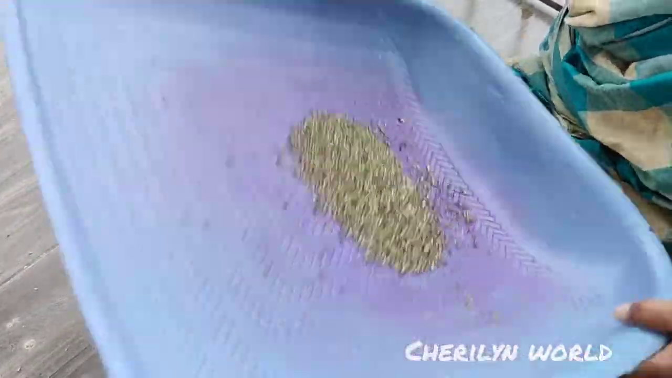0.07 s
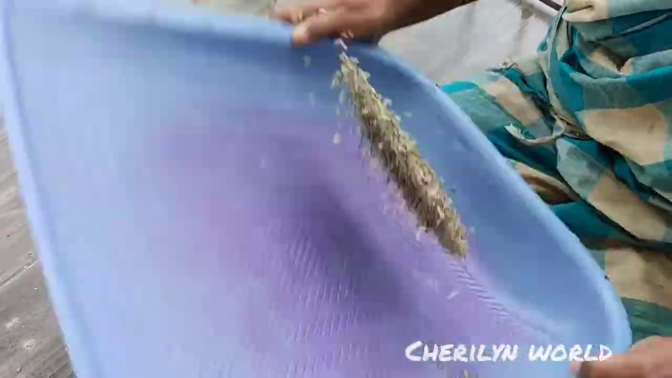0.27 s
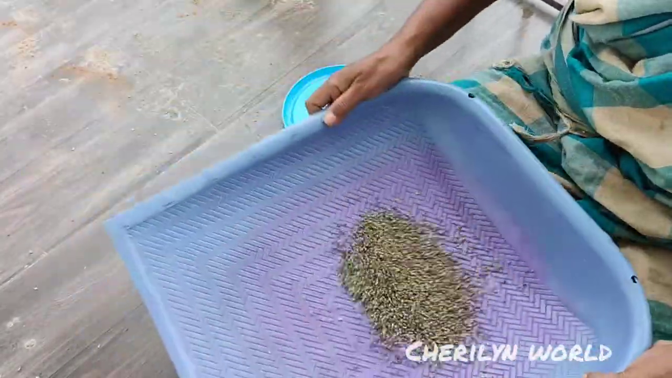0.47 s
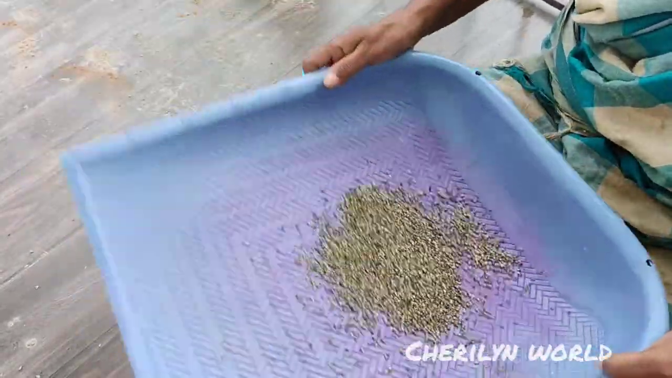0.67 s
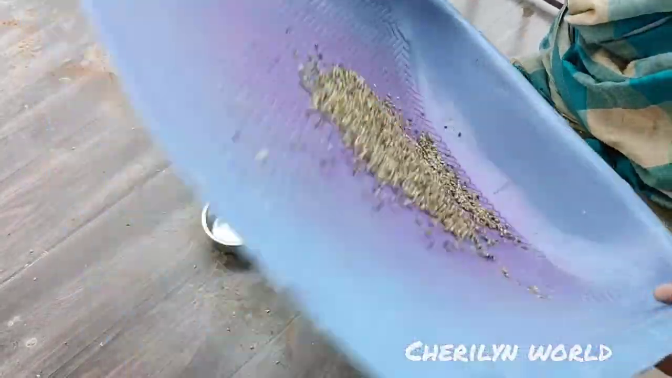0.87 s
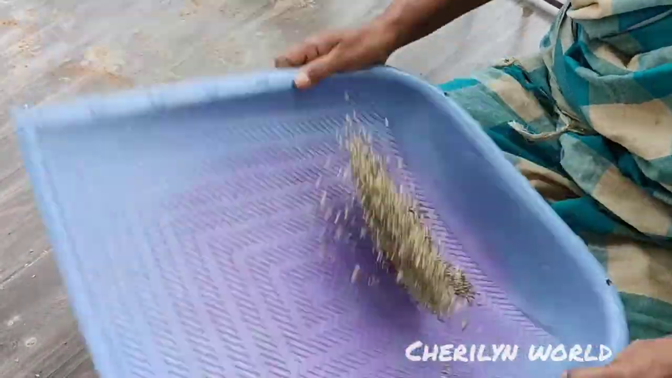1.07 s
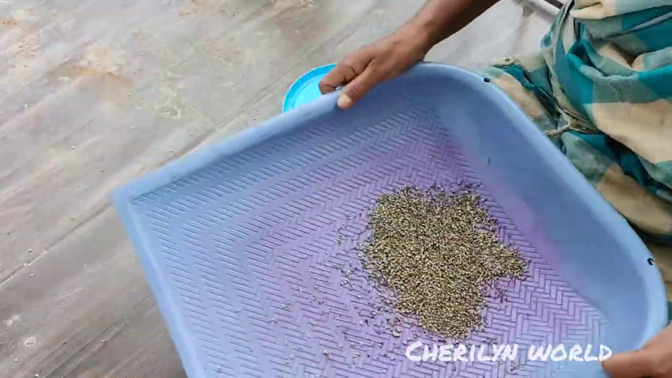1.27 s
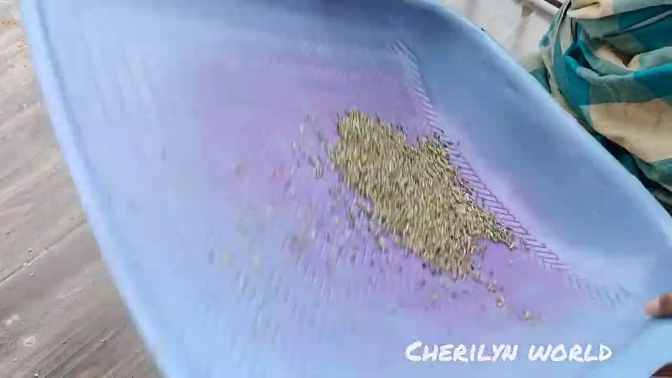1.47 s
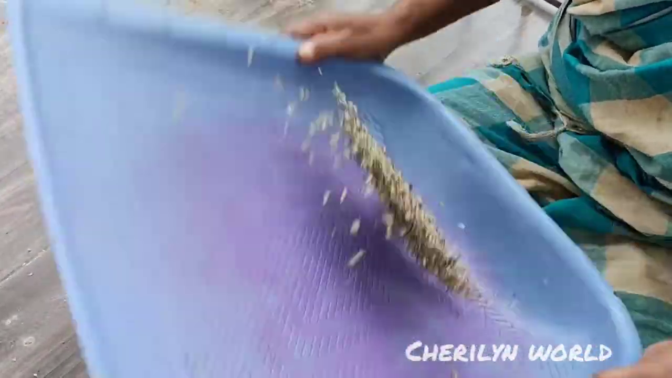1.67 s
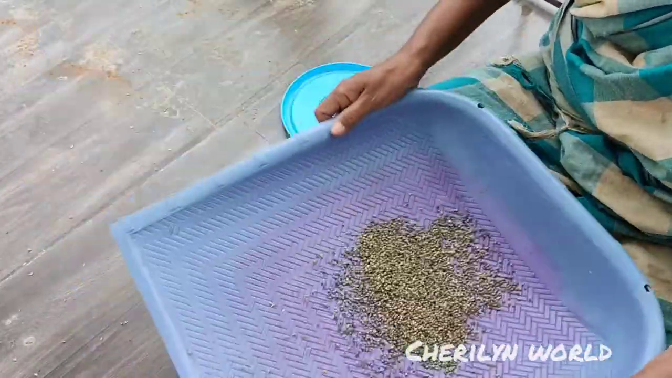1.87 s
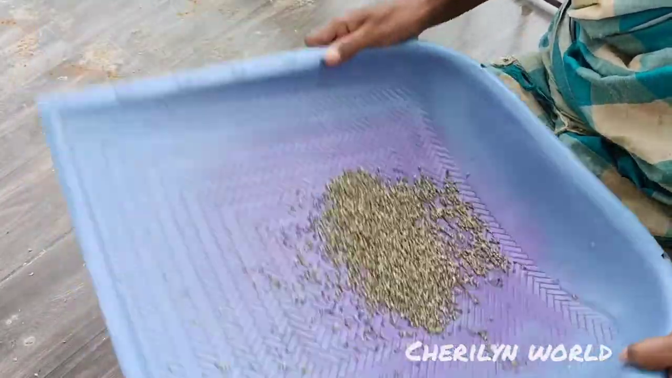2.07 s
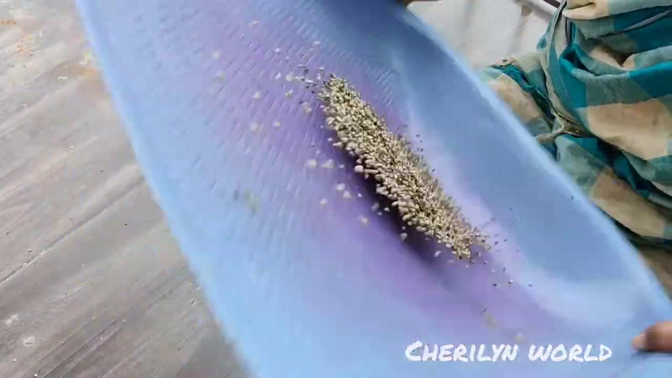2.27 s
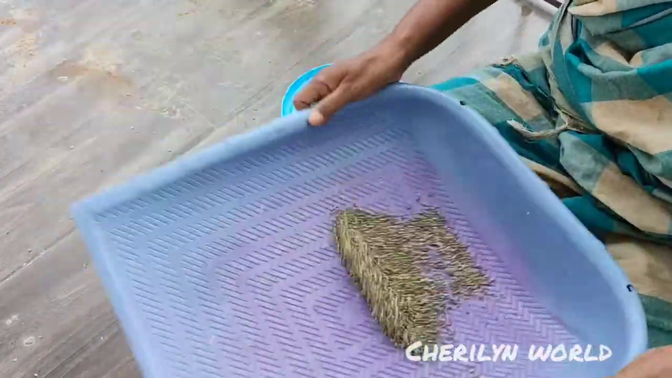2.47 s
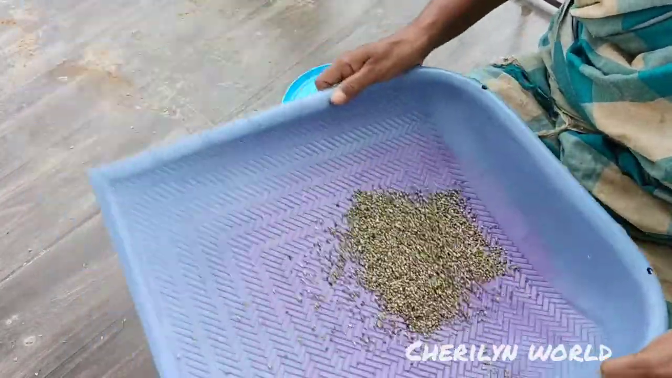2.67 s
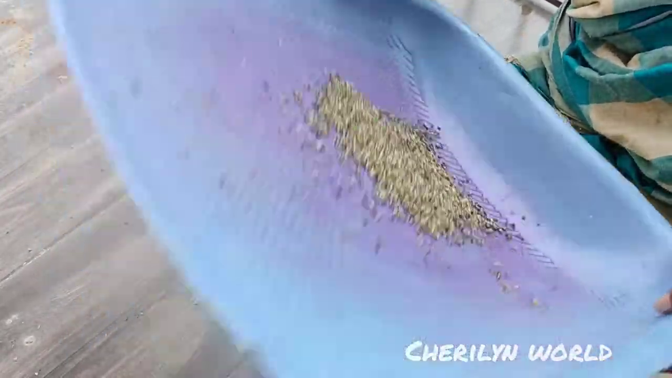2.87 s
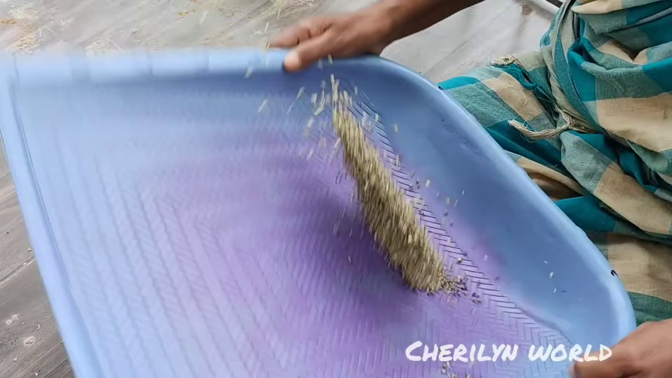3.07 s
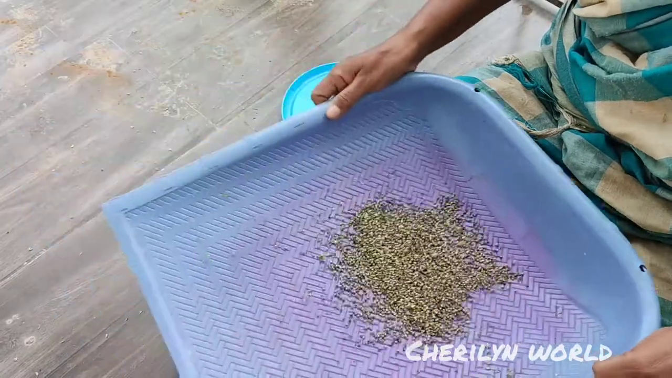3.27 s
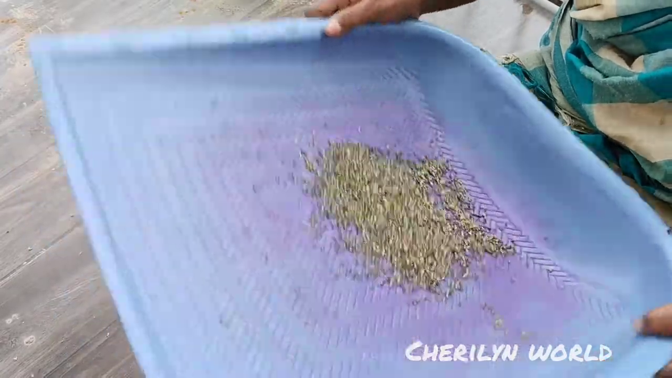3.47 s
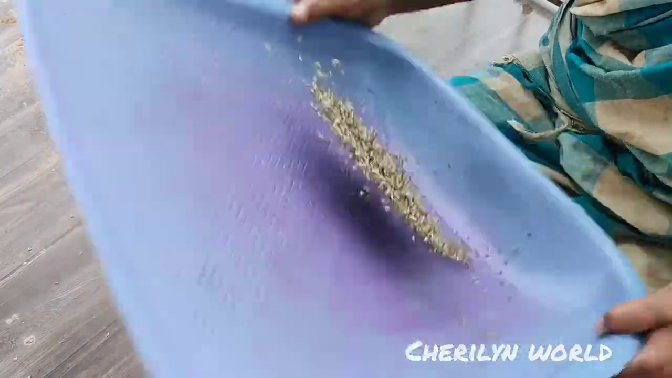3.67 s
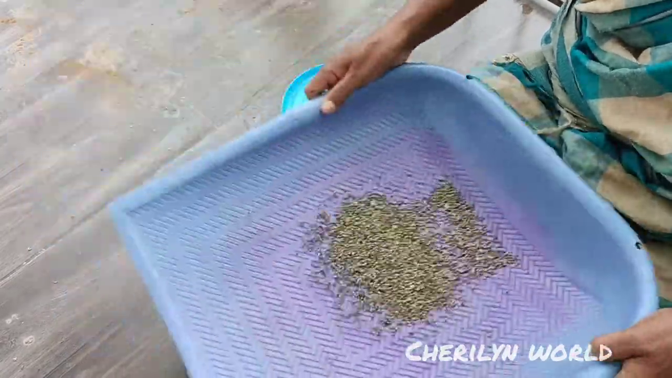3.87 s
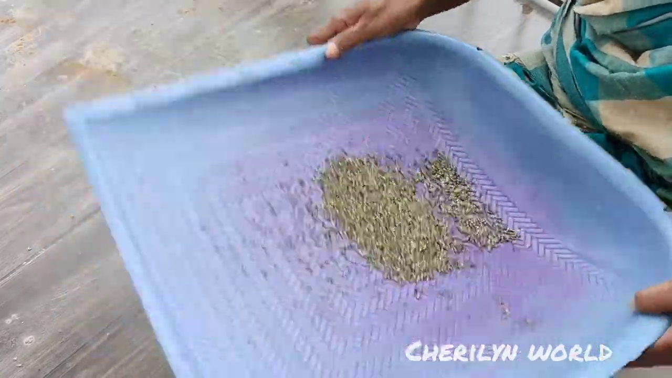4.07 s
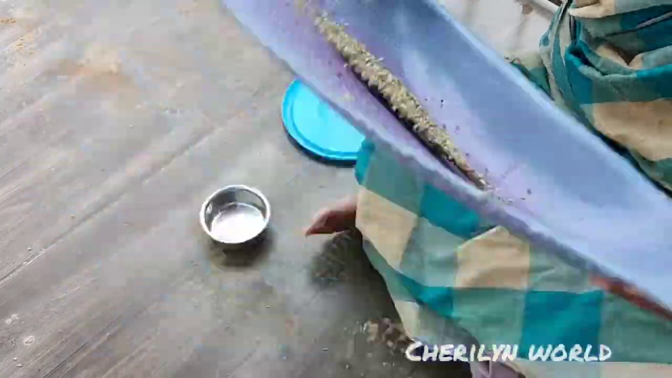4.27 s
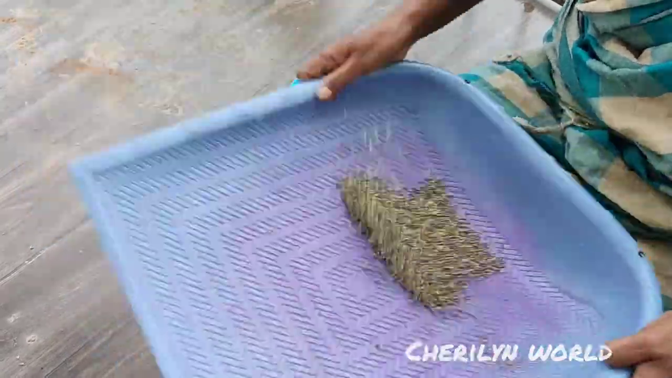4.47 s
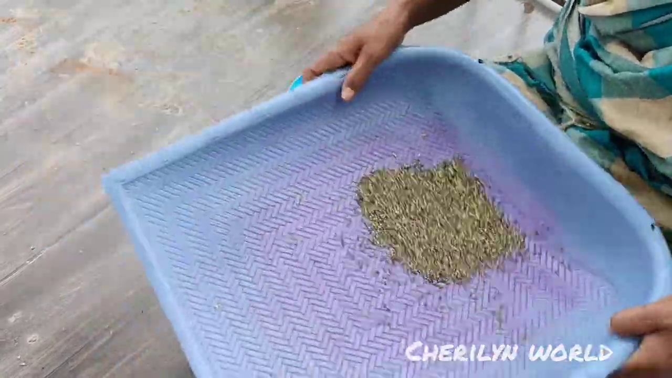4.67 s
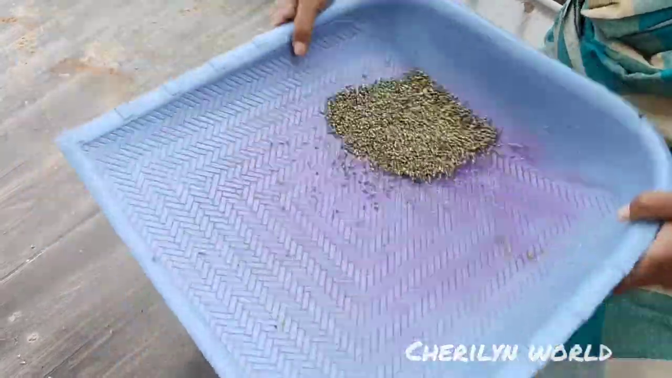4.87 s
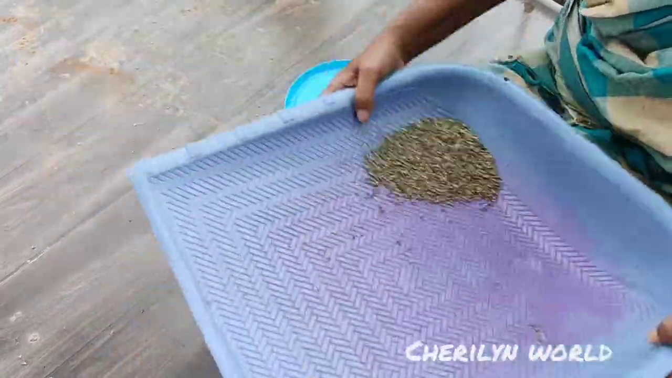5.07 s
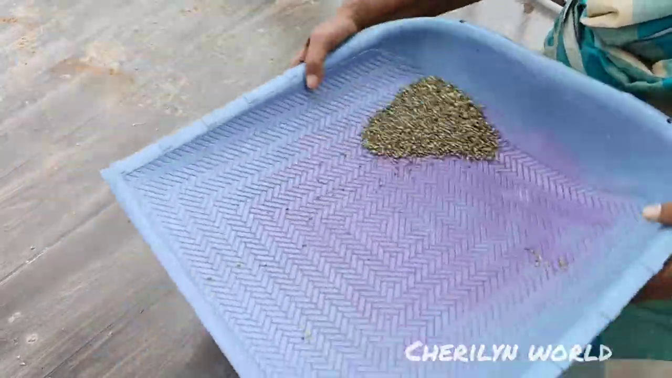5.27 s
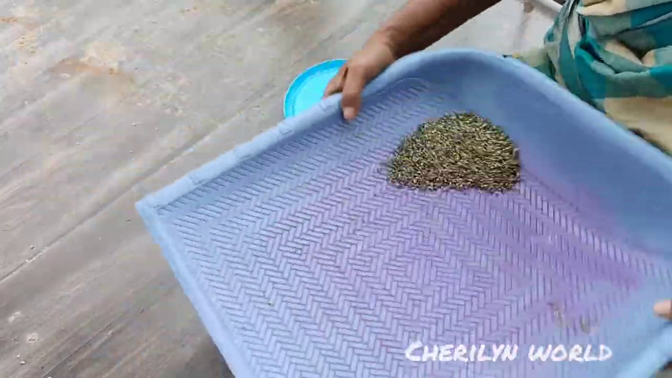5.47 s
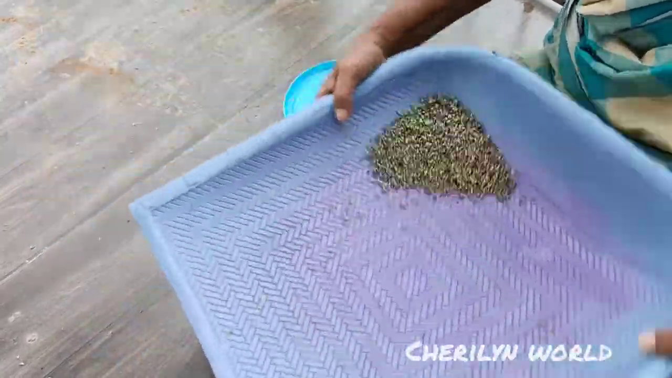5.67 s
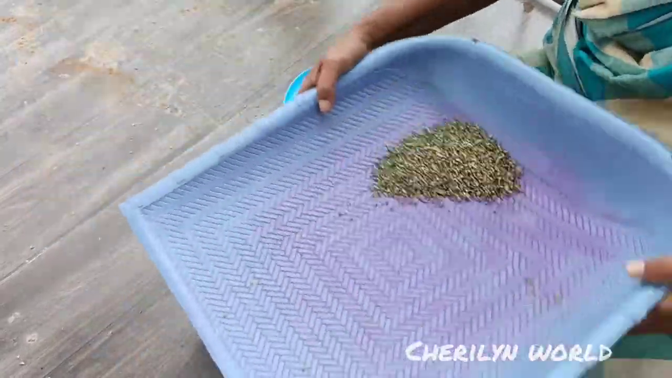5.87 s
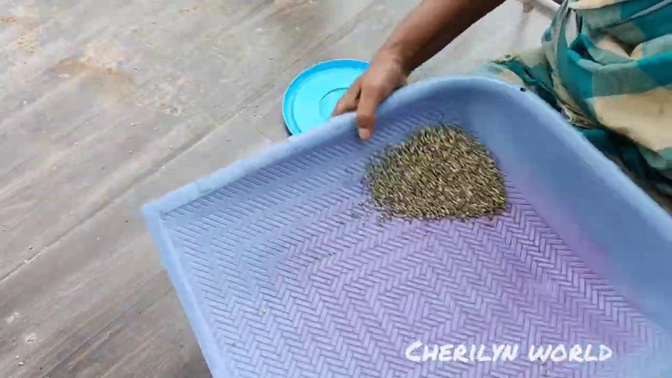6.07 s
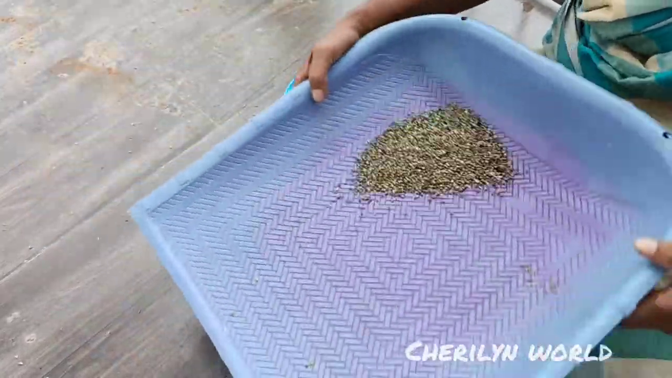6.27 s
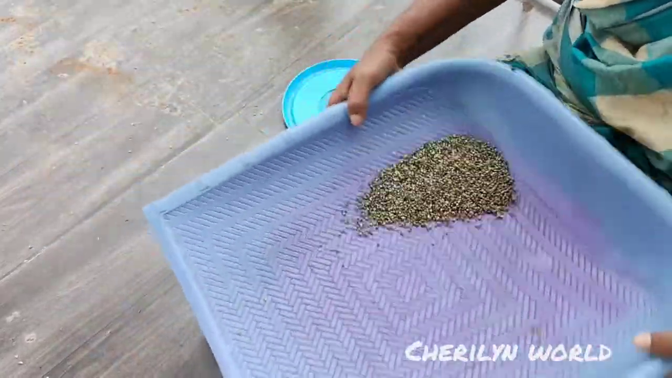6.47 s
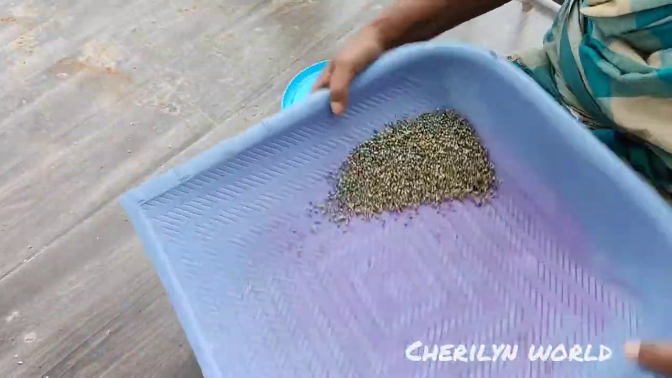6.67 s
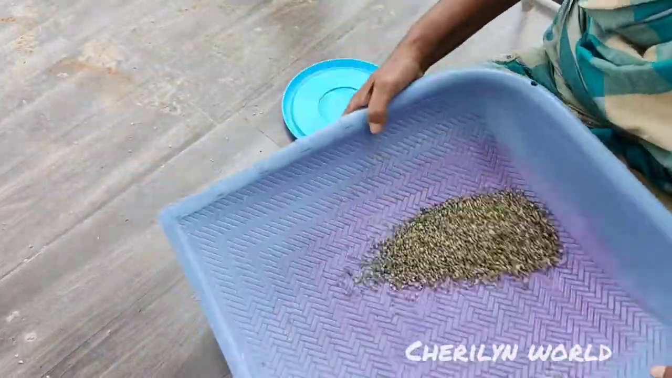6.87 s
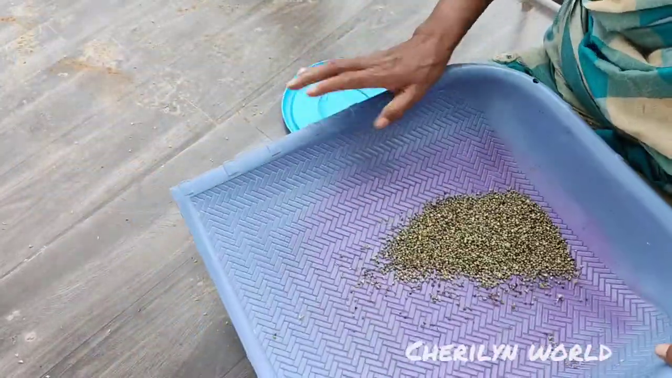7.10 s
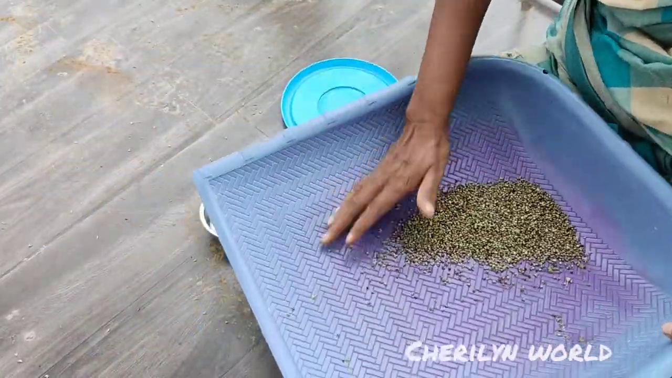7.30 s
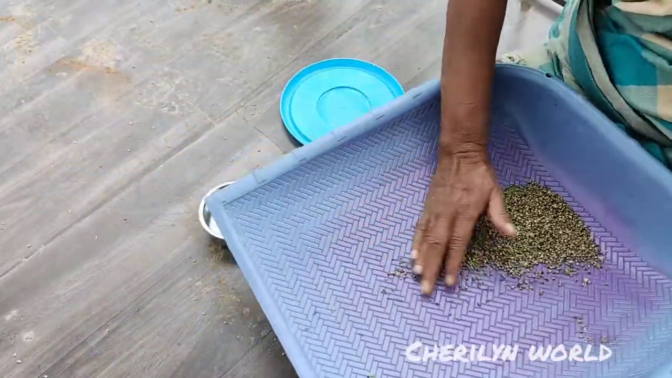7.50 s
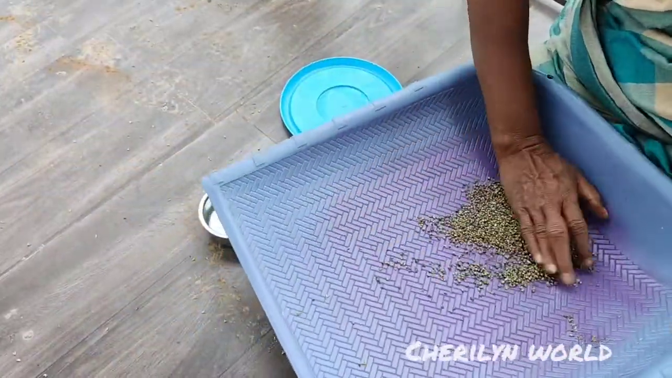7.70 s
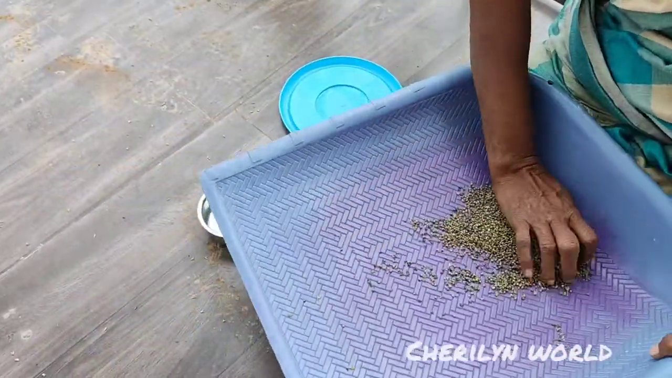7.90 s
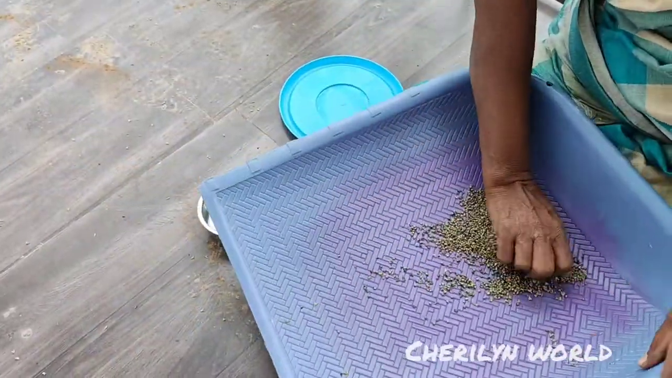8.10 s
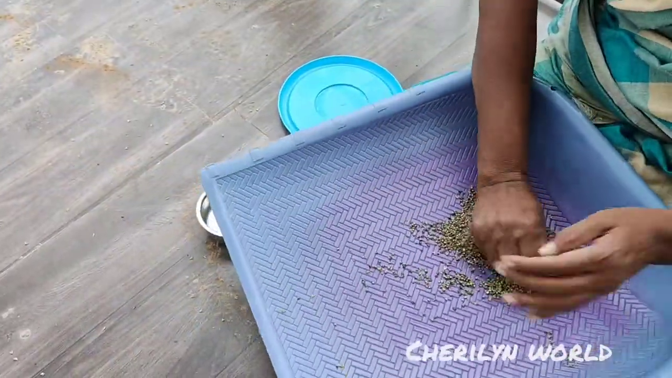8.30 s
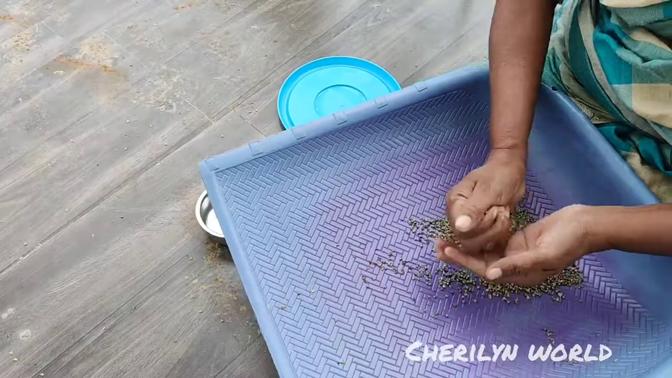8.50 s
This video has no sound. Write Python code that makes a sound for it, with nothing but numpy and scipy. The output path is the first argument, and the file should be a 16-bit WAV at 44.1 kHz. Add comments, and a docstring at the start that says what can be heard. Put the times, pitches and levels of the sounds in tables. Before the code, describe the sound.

Close up in a small room, dry roasted grains are tossed on a thin plastic tray about every 0.7 seconds, each landing as a bright swelling shower and fading trickle. The tray pops and booms softly. Around five seconds a dozen quick sideways shakes swish the grains, then a hand rubs and gathers them with clicks and dull crunching. Faint room murmur and a far engine lie behind.

```python
"""Close in front of a two-port microphone in a small room, roasted grains are winnowed on a plastic tray.
A toss is already trickling out; seven more follow, each a swelling shower of tiny impacts and a trickle.
Quick sideways shakes come next, then a hand rubs and gathers the grains.
The thin tray drums, booms and bulges with soft thumps; behind lie room murmur, draught and a faint engine.
The ports ring at slightly different treble pitches, which makes the swish bright and wide."""
import sys
import numpy as np
from scipy import signal
from scipy.fft import rfft, irfft, next_fast_len
from scipy.io import wavfile
from scipy.ndimage import uniform_filter1d

SR = 44100
rng = np.random.default_rng(int(sys.argv[2]) if len(sys.argv) > 2 else 0)


def dump(signal):
    """Clip the signal to [-1, 1] and save it as 16-bit WAV at the path in sys.argv[1]."""
    limited = np.clip(np.atleast_2d(signal).T, -1, 1)
    pcm = np.round(limited * 32767).astype(np.int16)
    wavfile.write(sys.argv[1], SR, pcm)


N = 376613
TIME = np.arange(N) / SR   # seconds

# Place of the heap. Each row: time in seconds, left over right in dB.
HEAP_PAN = [(0, 1.3), (4.5, 1.7), (5.2, 3.5), (8.5, 3.6)]
# Tosses. Each row: first grains land in seconds, their level in dB, heap lands in seconds, its level in dB,
# trickle level at that moment in dB, time until the trickle settles faster in seconds.
TOSSES = [(-.41, -22, -.33, -15, -24.5, .38), (.294, -26, .377, -14.4, -21, .37),
          (.998, -23.5, 1.09, -16.2, -22, .37), (1.696, -20, 1.782, -15.4, -24.5, .37),
          (2.366, -21.5, 2.446, -15.3, -22.5, .38), (3.034, -29.5, 3.148, -15.5, -26, .34),
          (3.695, -23.5, 3.795, -15.4, -24.5, .35), (4.369, -27, 4.479, -15.4, -23, .22)]
SHOWER_HOLD_S, SHOWER_FALL_DB_PER_S = .027, 205
SWELL_ROUNDING = 1.28   # exponent: the shower swells fast at first, then levels off
BUILD_S = .017   # the first grains arrive within this time
FORERUNNER_DB, FORERUNNER_RISE_DB_PER_S = -45, 600   # a few grains come down ahead of the rest
TRICKLE_FALL_DB_PER_S, SETTLE_FALL_DB_PER_S = 52, 125   # grains roll on, then come to rest
FLICK_LEAD_S, FLICK_LENGTH_S, FLICK_DB = .08, .2, -53   # the tray shivers as it flicks the heap up
FLIGHT_LEAD_S, FLIGHT_LENGTH_S, FLIGHT_HUSH_DB = .06, .2, 9   # the heap creeps less while in the air
CREEP_DB = -57.5   # the heap is never quite still
# Sideways shakes. Each row: middle of the stroke in seconds, length in seconds, level in dB.
SHAKES = [(4.945, .135, -17.4), (5.116, .21, -26.8), (5.311, .118, -20.5), (5.473, .177, -21.6),
          (5.648, .144, -21.4), (5.793, .17, -22), (5.975, .154, -21.1), (6.134, .183, -21.4),
          (6.322, .141, -20.6), (6.467, .173, -21.5), (6.649, .137, -20), (6.83, .26, -21.2)]
STROKE_EDGE_DB = 14   # a stroke is this much quieter at its ends
SLIDE_LEAD_S = .016   # in a shake the heap slides before it tumbles
# Pinches of loose grains rolling across the tray. Each row: middle in seconds, length in seconds, level in dB.
ROLLS = [(2.36, .04, -43), (3.0, .06, -54), (3.652, .045, -43), (4.308, .05, -50), (4.371, .026, -37),
         (7.325, .04, -43), (8.41, .06, -48)]
# Grains stirred by the hand. Each row: time in seconds, level in dB.
STIRRING = [(7.0, -52), (7.1, -50), (7.25, -52), (7.442, -40.5), (7.52, -29), (7.878, -42), (7.912, -35.5),
            (7.99, -41), (8.002, -35), (8.302, -51), (8.314, -47), (8.45, -60)]
FINGER_JERK_DB, FINGER_JERK_HZ = 1.6, 22   # the fingers catch and slip in the heap
# The hand in the heap. Each row: time in seconds, share of the clicks muffled (0-1), rubbing in dB.
HAND = [(7.0, 0, -68), (7.44, 0.2, -59), (7.53, 0.18, -40), (7.7, 0.3, -44.5), (7.83, 0.85, -56),
        (7.95, 0.87, -48.5), (8.13, 0.6, -44), (8.24, 0.88, -58), (8.45, 0, -65)]
CRUNCH_PER_S, CRUNCH_DB, CRUNCH_HZ, CRUNCH_WIDTH_HZ = 900, -6, 1500, 900   # grains dragged under the palm

# Click of one grain. Each row: frequency in Hz, relative level in dB.
HUSK = [(300, -18), (900, -3), (1300, -3.2), (1700, -5.3), (2200, -1.5), (3200, -.2), (4500, -6),
        (6000, -2.7), (7500, -0.7), (9200, -1.7), (10500, -7.5), (13000, -3.5), (15500, -7.5)]
HUSK_DB = -3.9   # clicks against the level of the moving grains
BOUNCE_FOLLOWS = 1.07   # bright bounces die away faster than the movement
# Scratch of a grain that slides instead of bouncing. Each row: frequency in Hz, relative level in dB.
SCRATCH = [(300, -22), (900, -5), (1300, -7), (1700, -8.5), (2600, -1), (3600, -.5), (4500, -2), (6000, -8),
           (8000, -5), (10000, -15), (15500, -20)]
SCRATCH_DB, SCRATCH_FOLLOWS = -6.5, .9   # against the moving grains; share of their dB swing it follows
# Single grains snapping against the plastic. Each row: time in seconds, strength in dB.
TICKS = [(.241, -27), (.998, -29.5), (1.668, -34), (1.822, -8), (2.035, -19), (2.992, -33), (3.015, -33),
         (3.542, -25), (4.162, -27), (4.284, -26.5), (4.345, -31), (4.361, -22), (7.060, -28), (7.197, -32),
         (7.318, -27), (7.398, -21), (7.468, -17.5), (7.488, -19), (7.518, -16), (7.541, -12), (7.561, -17),
         (7.726, -22), (7.809, -23), (8.0, -22), (8.175, -28), (8.327, -27), (8.399, -31), (8.490, -26),
         (8.510, -22), (8.519, -25)]
TICK_LOW_HZ, SKITTER_SHARE = 3500, 1.3   # a snap is thin and bright
STRAYS_PER_S, STRAY_DB, STRAY_SPREAD_DB = 7, -38, 3   # fainter snaps come at random
HARD_PER_S, HARD_DB, HARD_SPREAD_DB = 70, 4.5, 2.8   # hard seeds stand out of the moving grains

# Bending modes of the tray. Each row: frequency in Hz, width in Hz, relative level in dB.
TRAY_MODES = [(110, 23, -5), (168.4, 26, 1), (237, 26, -1), (290, 48, -5), (335.2, 29.5, -2.5),
              (399, 15.6, -1), (459.6, 15.2, -2.5), (566, 32, -9), (624, 16, -5.5), (678, 23, 0),
              (820, 140, -4.5), (936, 85, -.5), (1094, 130, -7.5), (1330, 300, -5.5)]
DRUM_DB, DRUM_FOLLOWS = -33, .68   # tray floor under the densest shower; share of the dB swing it follows
# Bulges of the swung tray. Each row: time in seconds, level in dB, pitch in Hz, share that is a clean pop (0-1).
BULGES = [(.028, -31.5, 365, .6), (.502, -29.5, 350, .5), (.956, -31.5, 350, .6), (1.361, -31, 360, .6),
          (2.679, -36.5, 290, .3), (3.572, -31.5, 265, .4), (5.606, -37, 340, .3), (6.085, -36.5, 380, .4),
          (7.075, -37, 320, .2)]
BULGE_DECAY_S = .042
POP_S, POP_OCTAVES_PER_S, POP_DB = .036, 44, -1.8   # the sheet stiffens as it bows, so its pitch shoots up
# it swings back, lower and softer
REBOUND_S, REBOUND_DB, REBOUND_PITCH_SHARE, REBOUND_DECAY_S = .038, -6, .62, .075
# and its ring sinks in pitch as it slackens
REBOUND_RING_HZ, REBOUND_RING_S, REBOUND_OCTAVES_PER_S, REBOUND_RING_DB = 200, .056, -5, -5
FLEX_DB, FLEX_HZ, FLEX_DECAY_S = -18.5, 720, .1   # higher modes rustle while the sheet bends
# Short knocks and thumps of the tray. Each row: time in seconds, level in dB, decay in seconds, pitch in Hz.
SHORT_THUMPS = [(2.858, -37.5, .04, 165), (3.632, -35, .036, 680), (7.287, -34.5, .021, 290),
                (7.72, -25.5, .0081, 410), (8.045, -40.5, .078, 357), (8.318, -29.5, .019, 310)]
JOLT_S, JOLT_LENGTH_S, JOLT_DB = .022, .08, -43   # the grains stir briefly just after each
# Booms of the tray. Each row: bare floor peaks in seconds, its level in dB,
# loaded floor peaks in seconds, its level in dB, rise or fall of the loaded boom in seconds.
BOOMS = [(.365, -39, .41, -33, .11), (1.06, -39, 1.112, -30.5, .09), (1.748, -31, 1.793, -31, .11),
         (2.435, -34, 2.47, -29, .08), (3.09, -39, 3.17, -33.5, .15), (3.765, -37, 3.835, -30.5, .11),
         (4.475, -37, 4.49, -37, .09), (4.945, -37, 4.955, -42, .06), (6.81, -39, 6.85, -37, .14)]
BARE_HZ, BARE_WIDTH_HZ, BARE_LENGTH_S = 780, 330, .09   # hollow while the floor is still bare
LOADED_HZ, LOADED_WIDTH_HZ = 345, 210   # deeper once the heap weighs on it

# Room murmur. Each row: frequency in Hz, relative level in dB.
ROOM_NOISE = [(20, -3), (45, -6.5), (80, 1.5), (120, -6.5), (175, -8.5), (280, -14.5), (500, -13.5),
              (900, -21.5), (1600, -24), (4000, -30), (9000, -60.5), (15000, -95)]
ROOM_NOISE_DB = -51.5
# Air stirring at a port. Each row: frequency in Hz, relative level in dB.
DRAUGHT = [(10, -8), (25, -1), (50, -3), (100, -9.5), (200, -19), (400, -30), (1500, -62)]
# Soft low puffs and thumps. Each row: time in seconds, level in dB, decay in seconds, pitch in Hz.
LOW_PUFFS = [(2.18, -44, .05, 75), (2.31, -44, .04, 75), (2.42, -41.5, .1, 39.2), (2.5, -34, .04, 75),
             (2.865, -35, .04, 55), (3.17, -43, .17, 100), (3.612, -35, .06, 135), (6.105, -37.5, .1, 88),
             (7.62, -47, .19, 120), (8.41, -43, .04, 78)]
FAN_S, FAN_DB, FAN_HZ, FAN_DECAY_S = .05, -10, 88, .13   # each bulge also fans air over the ports
# Far engine. Each row: time in seconds, pitch of the main line in Hz, level in dB.
HUM = [(0, 178, -55), (1.2, 172, -54), (2, 166, -55), (3, 162, -53.5), (4.2, 156, -55.5), (4.9, 150, -53.5),
       (5.7, 145, -63), (8.5, 156, -63)]
# Lines of the engine. Each row: multiple of the main line, level against it in dB.
HUM_LINES = [(.5, -5), (1, 0), (1.2, -6)]
HUM_WAVER_SHARE, HUM_FLUTTER_DB = .022, 3
# Microphone ports, left then right. Each row: resonance in Hz, quality factor.
PORTS = [(8820, 7.77), (7630, 7.16)]
CUTOFF_HZ = 15700


def grains():
    """Grains click, scratch and drum on the tray; a hand dulls the clicks, crunches and rubs."""
    rattle_db, slide_db, drum_db = motion()
    top_db = rattle_db.max()
    muffle, rub_db = in_time(HAND)
    pan_db, = in_time(HEAP_PAN)
    # fewer grains move as the heap settles, and fewer still under the fingers
    per_s = 7500 * from_db(.17 * (rattle_db - top_db) - 7 * muffle)

    hits = impacts(per_s, size_spread_db=2.7, clump_db=.8, clump_hz=161)
    hits = scatter(hits, t60=.026, share=.75, roam_hz=4)
    husks = hits * from_db(top_db + BOUNCE_FOLLOWS * (rattle_db - top_db) + HUSK_DB)
    dulled = 1.8 * butter(husks, 8000, "low", order=1)
    husks = husks + muffle * (dulled - husks)
    clicks = colour(husks + ticks(rattle_db), HUSK)

    slips = impacts(.6 * per_s, size_spread_db=2.5, clump_db=1.1, clump_hz=120)
    slips = scatter(slips, t60=.008, share=.9, roam_hz=3, count=6)
    scratch = colour(slips, SCRATCH) * from_db(top_db + SCRATCH_FOLLOWS * (slide_db - top_db) + SCRATCH_DB)

    floor = tray(ports_apart(hits, alike_hz=685))
    drum = rms_one(butter(floor, 270, "high")) * from_db(drum_db)

    crushed = impacts(CRUNCH_PER_S, size_spread_db=3, clump_db=2.5, clump_hz=35)
    crunches = echoes(crushed[None], delay_s=.0002, t60=.012, dull_hz=3000)
    crunch = from_db(CRUNCH_DB) * rms_one(resonance(crunches, CRUNCH_HZ, CRUNCH_WIDTH_HZ))
    rumble = rms_one(resonance(floor, 352, 170))
    rub = (rumble + crunch) * from_db(rub_db)
    return (clicks + scratch + drum + rub) * from_db(np.array([pan_db, -pan_db]) / 2)


def motion():
    """Levels in dB of the tumbling grains, the sliding grains and the tray floor drumming under them."""
    stir_db = np.interp(TIME, *np.transpose(STIRRING), left=-np.inf) + FINGER_JERK_DB * wander(FINGER_JERK_HZ)
    in_flight = sum(hump(TIME - first_s + FLIGHT_LEAD_S + FLIGHT_LENGTH_S / 2, FLIGHT_LENGTH_S)
                    for first_s, *_ in TOSSES)
    creep_db = CREEP_DB - FLIGHT_HUSH_DB * in_flight
    tosses = [toss(*row) for row in TOSSES]
    jolts = [stroke(s + JOLT_S, JOLT_LENGTH_S, JOLT_DB) for s, *_ in SHORT_THUMPS]
    rolls = [stroke(*row) for row in ROLLS]
    loose_db = together([creep_db, stir_db] + tosses + jolts + rolls)
    shaken_db = together([stroke(*row) for row in SHAKES])
    rattle_db = together([loose_db, shaken_db])
    early_shaken_db = np.interp(TIME + SLIDE_LEAD_S, TIME, shaken_db)
    slide_db = together([loose_db, early_shaken_db + 1.2])
    flicks = [stroke(first_s - FLICK_LEAD_S, FLICK_LENGTH_S, FLICK_DB) for first_s, *_ in TOSSES]
    drum_db = together([DRUM_DB + DRUM_FOLLOWS * (slide_db - rattle_db.max())] + flicks)
    return rattle_db, slide_db, drum_db


def toss(first_s, first_db, heap_s, heap_db, trickle_db, trickle_s):
    """The first grains patter down, the shower swells until the heap lands, then stragglers roll and settle."""
    before = np.maximum(heap_s - TIME, 0)
    after = np.maximum(TIME - heap_s, 0)
    still_to_swell = np.interp(TIME, [first_s + BUILD_S, heap_s], [1, 0]) ** SWELL_ROUNDING
    swell = heap_db + (first_db - heap_db) * still_to_swell
    shower = swell - SHOWER_FALL_DB_PER_S * np.maximum(after - SHOWER_HOLD_S, 0)
    trickle = trickle_db - SHOWER_FALL_DB_PER_S * before - TRICKLE_FALL_DB_PER_S * after
    trickle = trickle - SETTLE_FALL_DB_PER_S * np.maximum(after - trickle_s, 0)
    arrived = np.clip((TIME - first_s) / BUILD_S, 0, 1) ** 2
    forerunners = FORERUNNER_DB - FORERUNNER_RISE_DB_PER_S * np.abs(TIME - first_s - BUILD_S / 2)
    return together([forerunners, together([shower, trickle]) + 20 * np.log10(arrived + 1e-9)])


def stroke(middle_s, length_s, db):
    """The level swells and sinks with the speed of the movement."""
    return db - STROKE_EDGE_DB * np.minimum((2 * (TIME - middle_s) / length_s) ** 2, 10)


def ticks(rattle_db):
    """A lone grain strikes hard and skitters for a moment; hard seeds crackle wherever the heap moves."""
    stray_db = STRAY_DB + STRAY_SPREAD_DB * rng.standard_normal(N)
    strays = (rng.random(N) < STRAYS_PER_S / SR) * from_db(stray_db)
    hard_db = rattle_db + HARD_DB + HARD_SPREAD_DB * np.clip(rng.standard_normal(N), -2, 2)
    hard = (rng.random(N) < HARD_PER_S / SR) * from_db(hard_db)
    snaps = np.array([strays + hard, strays + hard])
    for s, db in TICKS:
        snaps[:, round(s * SR)] = from_db(db)
    skitter = SKITTER_SHARE * echoes(snaps, delay_s=.0003, t60=.02, dull_hz=9000)
    return butter(snaps + skitter, TICK_LOW_HZ, "high", order=1)


def impacts(per_s, size_spread_db, clump_db, clump_hz):
    """Random grain contacts of even power, bunched in clumps."""
    chance = np.clip(per_s / SR, 1e-4, 1)
    size = from_db(size_spread_db * np.minimum(rng.exponential(1, N), 3)) * rng.choice([-1, 1], N)
    clumps = from_db(clump_db * np.clip(wander(clump_hz), -2, 2))
    return (rng.random(N) < chance) * size * clumps / np.sqrt(chance)


def scatter(hits, t60, share, roam_hz, count=12):
    """Each spot scatters a click its own way; the busiest wanders slowly at random, so their colour shifts."""
    spot = np.floor(4 * wander(roam_hz) + .7 * rng.standard_normal(N)).astype(int) % count
    t = TIME[:SR // 30]
    out = np.zeros((2, N))
    for k in range(count):
        paths = rng.standard_normal((2, len(t))) * from_db(-60 * t / t60)
        paths *= share / np.sqrt(np.sum(paths ** 2, axis=1, keepdims=True))
        # the direct click reaches each port after its own small delay
        paths[[0, 1], rng.integers(0, 15, size=2)] += 1
        out += signal.oaconvolve((hits * (spot == k))[None], paths, axes=-1)[:, :N]
    return rms_one(out)


def tray(force):
    """The sheet rings in its bending modes, of alternating sign."""
    return sum((-1) ** k * from_db(db) * resonance(force, hz, width)
               for k, (hz, width, db) in enumerate(TRAY_MODES))


def tray_thumps():
    """The plastic pops out and rebounds when swung, gives short knocks and thumps, and booms under the heap."""
    shudders, pops = [], 0
    for s, db, hz, clean in BULGES:
        shudders.append((s, db + 10 * np.log10(1 - clean), BULGE_DECAY_S, hz))
        shudders.append((s + REBOUND_S, db + REBOUND_DB, REBOUND_DECAY_S, hz * REBOUND_PITCH_SHARE))
        out = from_db(POP_DB) * glide(s + POP_S / 3, POP_S, hz, POP_OCTAVES_PER_S)
        back_s = s + REBOUND_S + REBOUND_RING_S / 10
        back = glide(back_s, REBOUND_RING_S, REBOUND_RING_HZ, REBOUND_OCTAVES_PER_S)
        pops = pops + from_db(db) * np.sqrt(clean) * (out + from_db(REBOUND_RING_DB) * back)
    flexes = thuds(shudders + SHORT_THUMPS, rise_s=.0017, octaves=1.45, modal_share=.35)
    bending = [(s, db + FLEX_DB, FLEX_DECAY_S, FLEX_HZ) for s, db, *_ in BULGES]
    rustles = thuds(bending, rise_s=.004, octaves=.9, modal_share=.3)
    return (pops + flexes + rustles + booms()) * from_db([[1.1], [-1.1]])


def booms():
    """The grains first drum on the bare floor; the weight of the heap then pulls the boom down in pitch."""
    bare = sum(from_db(db) * hump(TIME - s + BARE_LENGTH_S, 2 * BARE_LENGTH_S) ** 2
               for s, db, *_ in BOOMS)
    loaded = sum(from_db(db) * hump(TIME - s + length_s, 2 * length_s) ** 2
                 for _, _, s, db, length_s in BOOMS)
    return bare * boom(BARE_HZ, BARE_WIDTH_HZ) + loaded * boom(LOADED_HZ, LOADED_WIDTH_HZ)


def boom(hz, width_hz):
    """Noise ringing in the tray's modes around one pitch, held at an even level."""
    ringing = tray(rng.standard_normal(N))
    for _ in range(2):
        ringing = resonance(ringing, hz, 2 * width_hz)
    return ringing / np.sqrt(np.abs(uniform_filter1d(ringing ** 2, size=1100)) + 1e-20)


def glide(middle_s, length_s, hz, octaves_per_s):
    """A few cycles of one mode whose pitch slides."""
    t = np.clip(TIME - middle_s, -length_s / 2, length_s / 2)
    turns = np.cumsum(hz * 2 ** (octaves_per_s * t)) / SR + rng.random()
    return np.sqrt(2) * hump(t + length_s / 2, length_s) * np.sin(2 * np.pi * turns)


def thuds(rows, rise_s, octaves, modal_share):
    """Soft blows: brief band-limited shudders, part of which passes through the tray's modes."""
    out = np.zeros(N)
    t = TIME[:SR // 2]
    for s, db, decay_s, hz in rows:
        swell = (1 - np.exp(-t / rise_s)) * np.exp(-t / decay_s)
        band = [hz / 2 ** (octaves / 2), hz * 2 ** (octaves / 2)]
        shudder = butter(rng.standard_normal(len(t)) * swell, band, "band", order=4)
        shudder = modal_share * rms_one(tray(shudder)) + (1 - modal_share) * rms_one(shudder)
        blow = from_db(db) * rms_one(shudder) * np.sqrt(np.mean(swell ** 2))
        rest = out[round(s * SR):][:len(t)]   # a view: adding to it adds to out
        rest += blow[:len(rest)]
    return out


def room_noise():
    """A low murmur with a hum and soft low puffs and thumps, and air stirring at each port, mostly the left."""
    murmur = colour(ports_apart(rng.standard_normal((2, N)), alike_hz=600), ROOM_NOISE)
    murmur = from_db(ROOM_NOISE_DB) * rms_one(murmur)
    draught = rms_one(colour(rng.standard_normal((2, N)), DRAUGHT)) * from_db(2.6 * wander(2.2))
    fanned = [(s + FAN_S, db + FAN_DB, FAN_DECAY_S, FAN_HZ) for s, db, *_ in BULGES]
    puffs = thuds(fanned + LOW_PUFFS, rise_s=.0034, octaves=1.7, modal_share=0)
    return (murmur + far_engine() + puffs) * from_db([[1.7], [-1.7]]) + draught * from_db([[-52], [-59]])


def far_engine():
    """A few low lines that waver together in pitch and flutter in level."""
    hz, db = in_time(HUM)
    turns = np.cumsum(hz * (1 + HUM_WAVER_SHARE * wander(5))) / SR
    lines = 0
    for multiple, line_db in HUM_LINES:
        level = from_db(db + line_db + HUM_FLUTTER_DB * wander(9))
        lines = lines + np.sqrt(2) * np.sin(2 * np.pi * multiple * turns) * level
    return lines


def echoes(x, delay_s, t60, dull_hz):
    """Dense dying reflections, different at each port."""
    t = TIME[:SR // 2]
    response = rng.standard_normal((2, len(t))) * from_db(-60 * t / t60) * (t > delay_s)
    response /= np.sqrt(np.sum(response ** 2, axis=1, keepdims=True) + 1e-20)
    response = butter(response, min(dull_hz, .45 * SR), "low", order=1)
    return signal.oaconvolve(x, response, axes=-1)[:, :N]


def ports_apart(pair, alike_hz):
    """Long waves reach both ports alike, short ones differently."""
    mid = pair[0] + pair[1]
    side = butter(pair[0] - pair[1], alike_hz, "high")
    return rms_one(np.array([mid + side, mid - side]))


def from_db(db):
    """Decibels to gain."""
    return 10 ** (np.asarray(db) / 20)


def together(levels_db):
    """Level of several unrelated sounds at once, in dB."""
    return 10 * np.log10(sum(from_db(db) ** 2 for db in levels_db) + 1e-20)


def rms_one(x):
    """Scale to unit power."""
    return x / np.sqrt(np.mean(x ** 2) + 1e-20)


def in_time(rows):
    """Each column of a curve at every sample."""
    s, *columns = np.transpose(rows)
    return [np.interp(TIME, s, c) for c in columns]


def hump(t, length_s):
    """A smooth rise and fall between 0 and the length."""
    return np.sin(np.pi * np.clip(t / length_s, 0, 1)) ** 2


def wander(hz):
    """A slow random value of spread 1."""
    return rms_one(butter(rng.standard_normal(N + SR), hz, "low")[SR:])


def butter(x, hz, kind, order=2):
    """Causal low-, high- or band-pass."""
    return signal.sosfilt(signal.butter(order, hz, kind, fs=SR, output="sos"), x + 1e-18)


def colour(x, spectrum, size=4096):
    """Causal (minimum-phase) filter through the points of a spectrum."""
    hz, db = np.transpose(spectrum)
    grid = np.maximum(np.fft.rfftfreq(size, 1 / SR), 1)
    cepstrum = irfft(np.log(from_db(np.interp(np.log(grid), np.log(hz), db))))
    # folding the cepstrum onto its first half puts all the energy as early as possible
    cepstrum[1:size // 2] *= 2
    cepstrum[size // 2 + 1:] = 0
    response = irfft(np.exp(rfft(cepstrum)))
    return signal.oaconvolve(x, response[None], axes=-1)[:, :N]


def resonance(x, hz, width_hz):
    """Two-pole resonance, gain about 1 on top."""
    r = np.exp(-np.pi * width_hz / SR)
    poles = [1, -2 * r * np.cos(2 * np.pi * hz / SR), r * r]
    return signal.lfilter(np.array([1, 0, -1]) * (1 - r * r) / 2, poles, x + 1e-18)


def scene():
    """Grains and tray close to the microphone with a short room tail, over the room noise."""
    near = grains() + tray_thumps()
    room = from_db(-8) * echoes(near, delay_s=.0021, t60=.19, dull_hz=7000)
    return near + room + room_noise()


def record(dry):
    """Each port is a small air cavity: a resonant low-pass. The top is cut steeply."""
    size = next_fast_len(N + SR // 10)
    hz = np.fft.rfftfreq(size, 1 / SR)
    ports = np.array([1 / (1 - (hz / port_hz) ** 2 + 1j * hz / port_hz / q) for port_hz, q in PORTS])
    heard = irfft(rfft(dry, size) * ports, size)[:, :N]
    heard = np.tanh(heard)   # the highest peaks are rounded
    return signal.sosfilt(signal.ellip(12, .2, 80, CUTOFF_HZ, fs=SR, output="sos"), heard)


dry = scene()
out = record(dry)
dump(out)
```